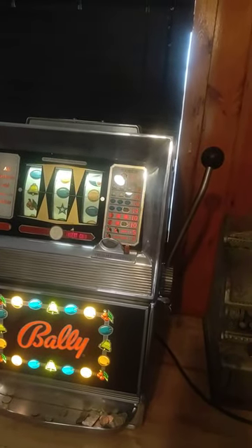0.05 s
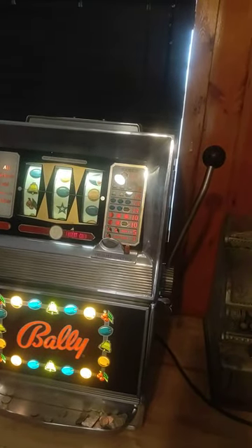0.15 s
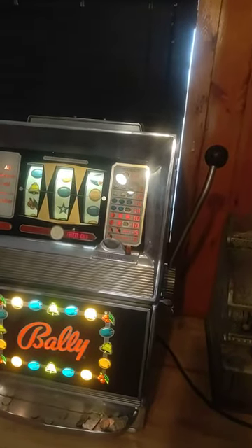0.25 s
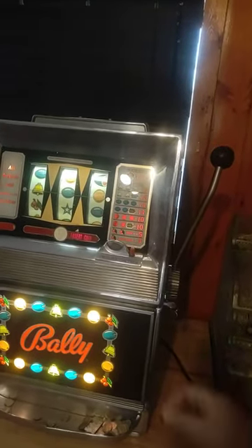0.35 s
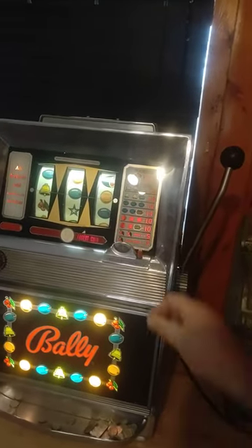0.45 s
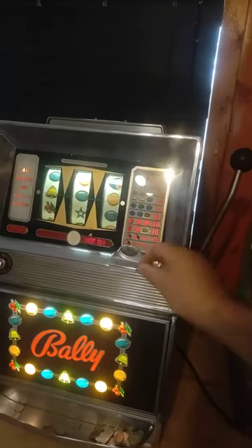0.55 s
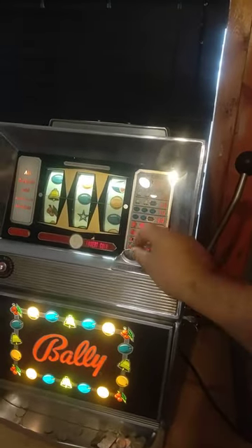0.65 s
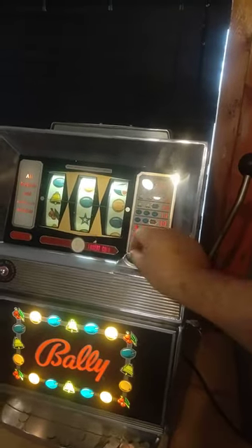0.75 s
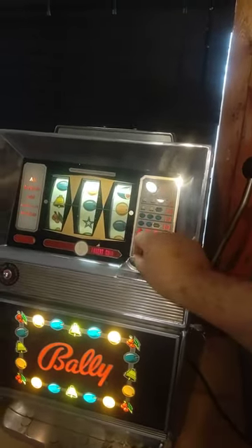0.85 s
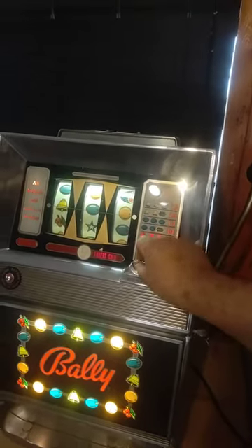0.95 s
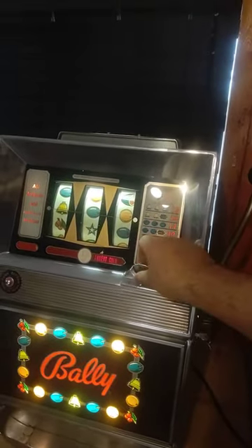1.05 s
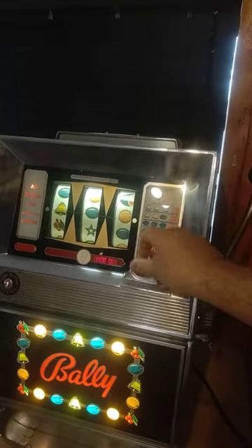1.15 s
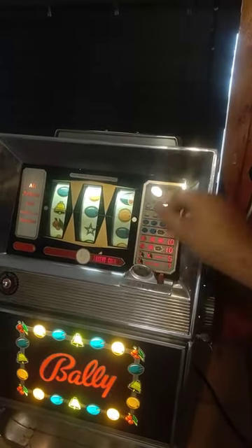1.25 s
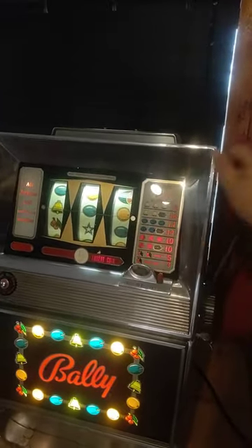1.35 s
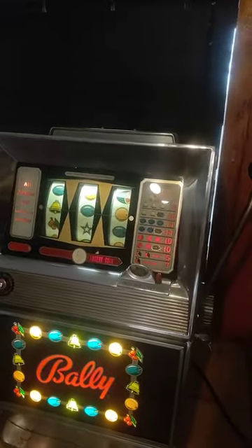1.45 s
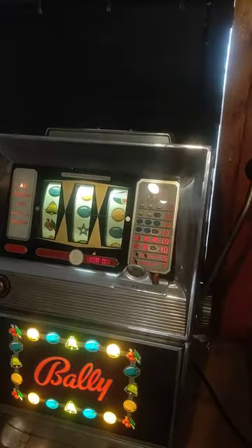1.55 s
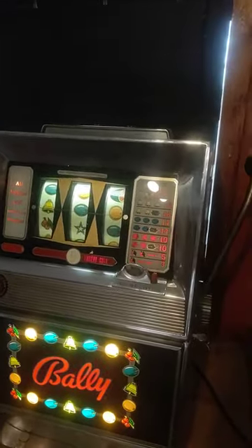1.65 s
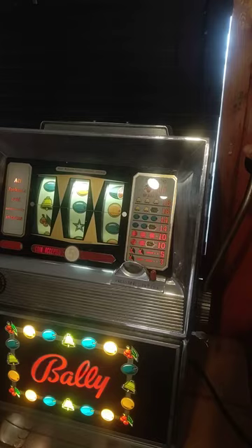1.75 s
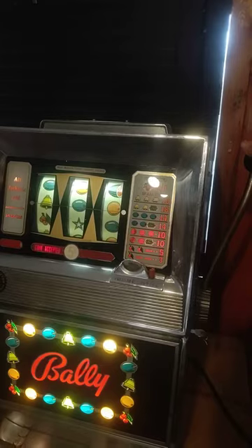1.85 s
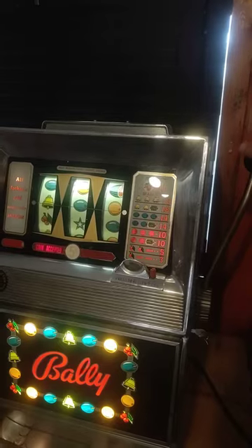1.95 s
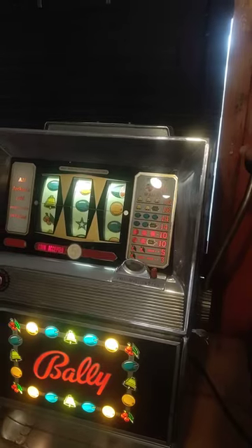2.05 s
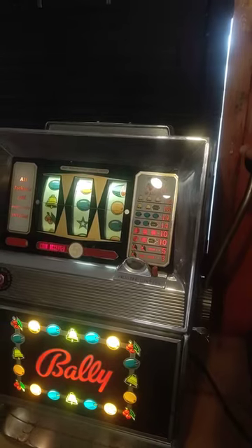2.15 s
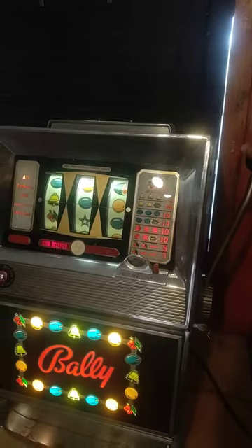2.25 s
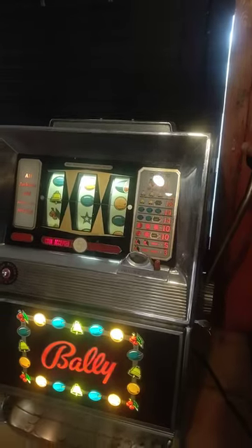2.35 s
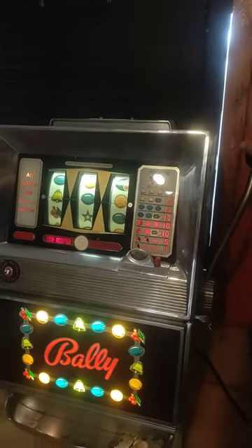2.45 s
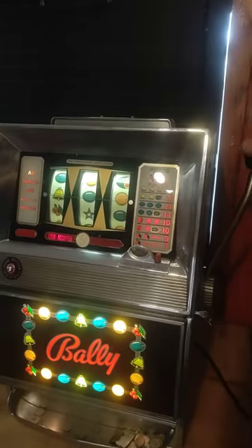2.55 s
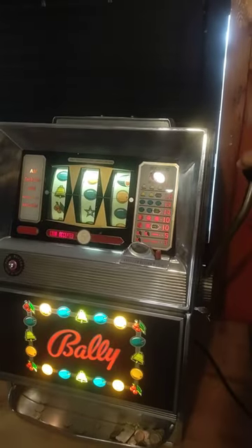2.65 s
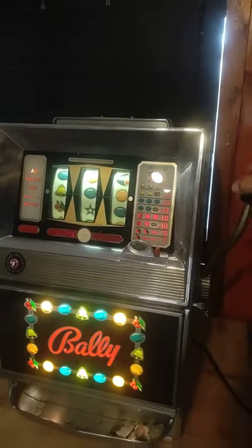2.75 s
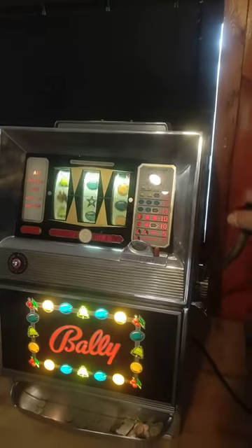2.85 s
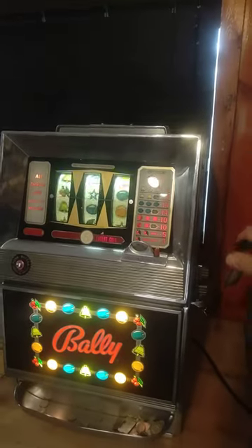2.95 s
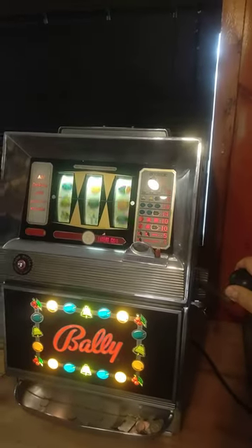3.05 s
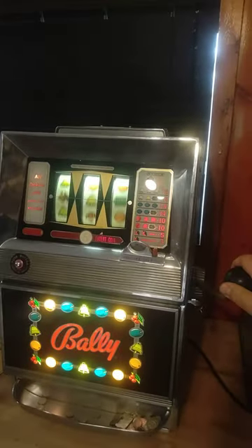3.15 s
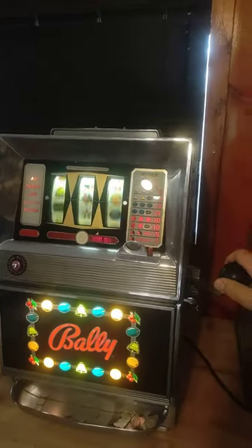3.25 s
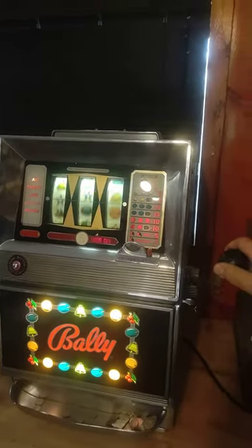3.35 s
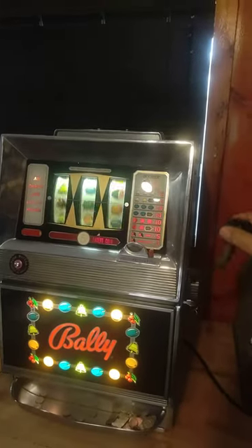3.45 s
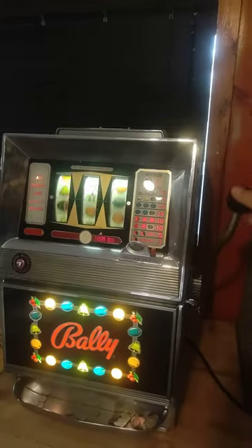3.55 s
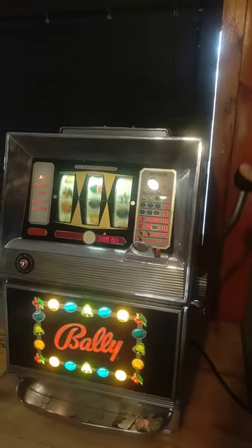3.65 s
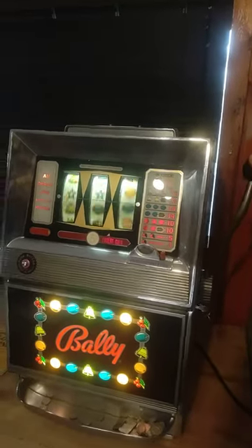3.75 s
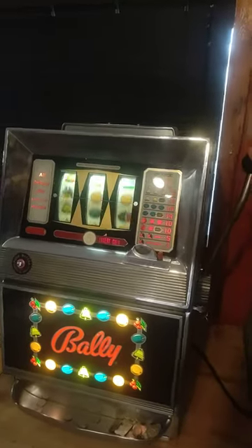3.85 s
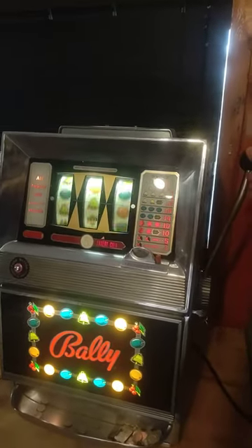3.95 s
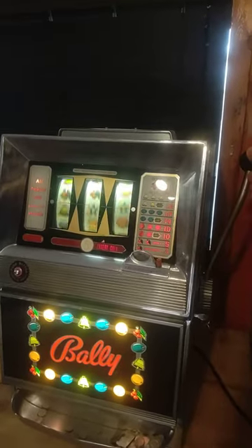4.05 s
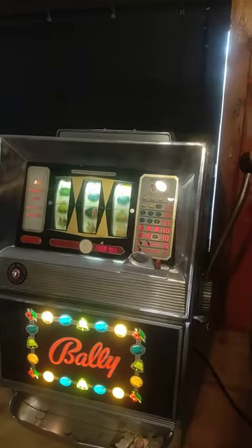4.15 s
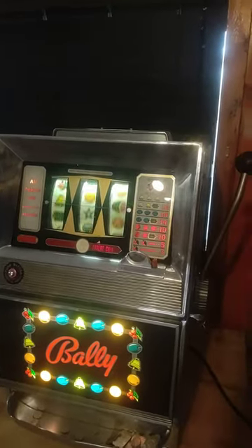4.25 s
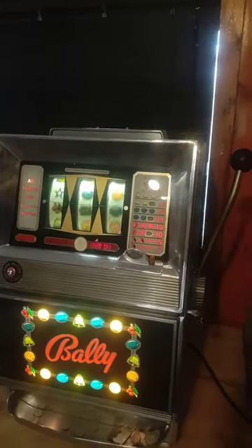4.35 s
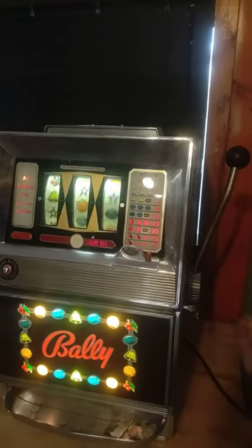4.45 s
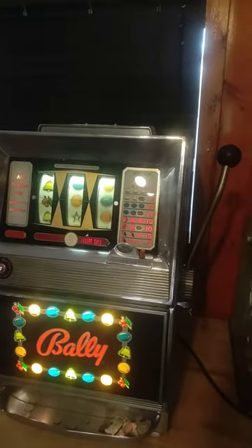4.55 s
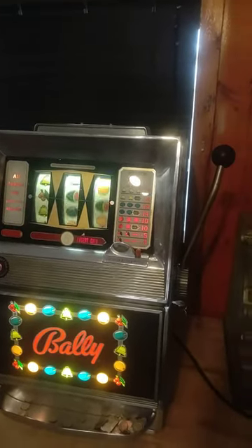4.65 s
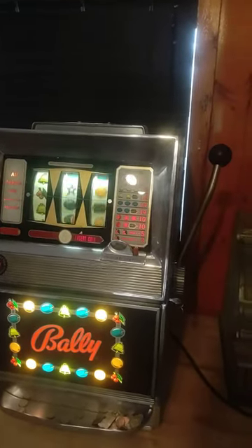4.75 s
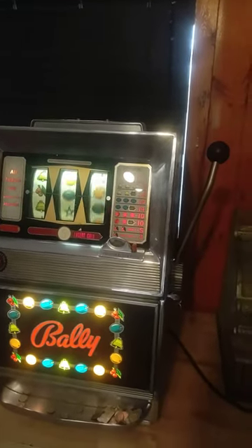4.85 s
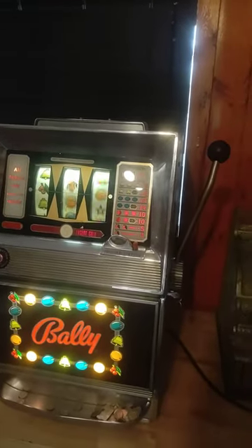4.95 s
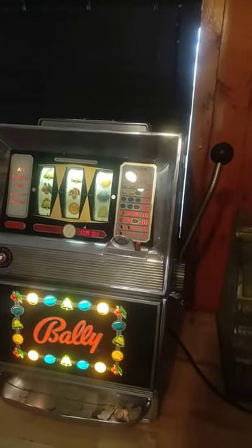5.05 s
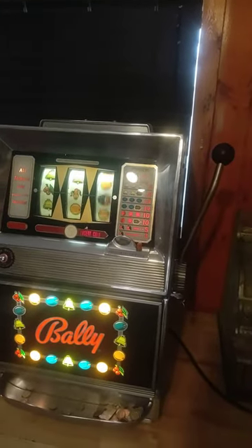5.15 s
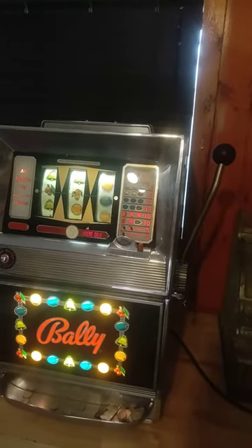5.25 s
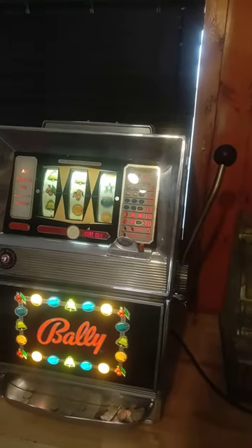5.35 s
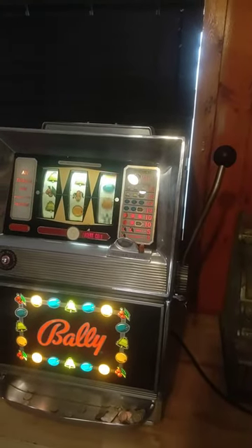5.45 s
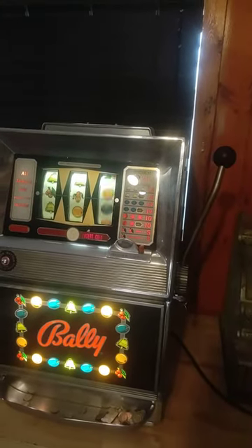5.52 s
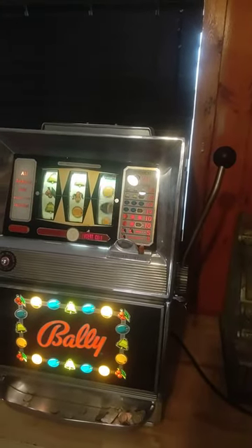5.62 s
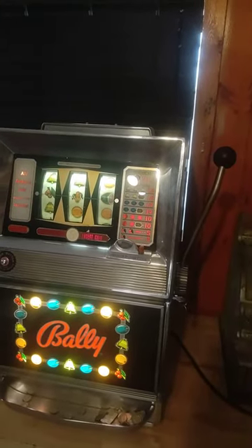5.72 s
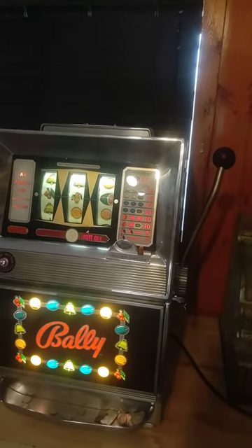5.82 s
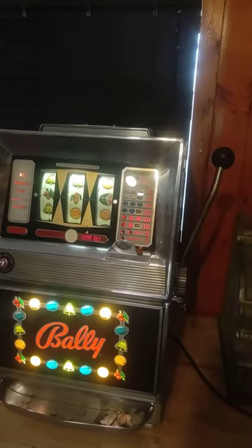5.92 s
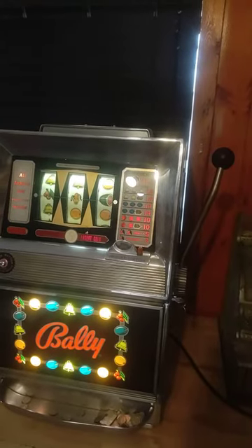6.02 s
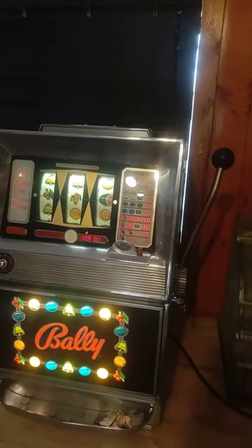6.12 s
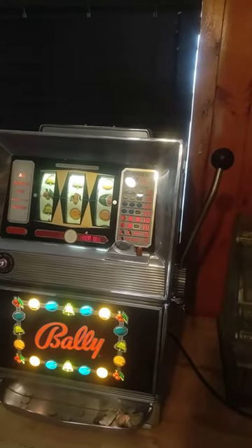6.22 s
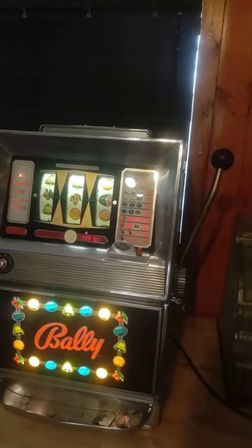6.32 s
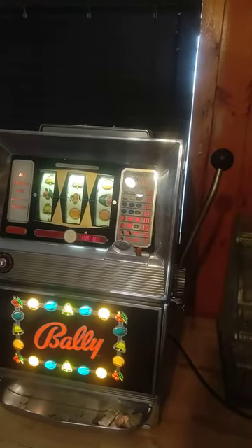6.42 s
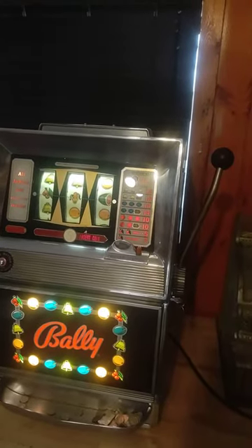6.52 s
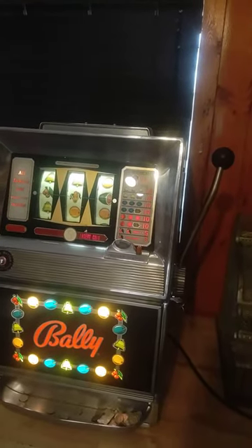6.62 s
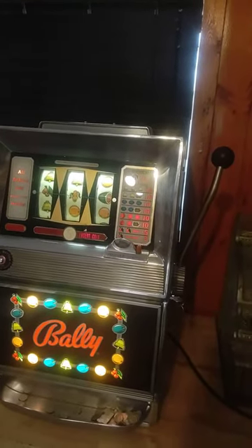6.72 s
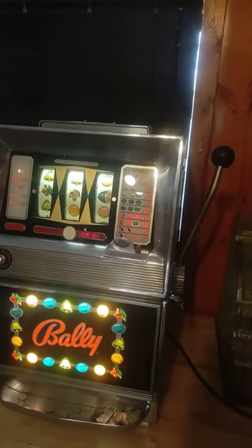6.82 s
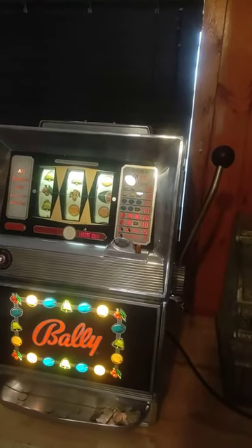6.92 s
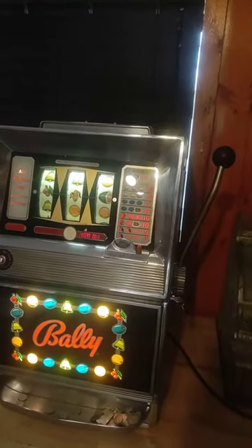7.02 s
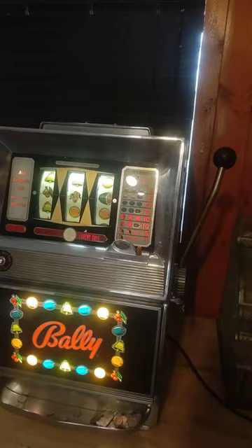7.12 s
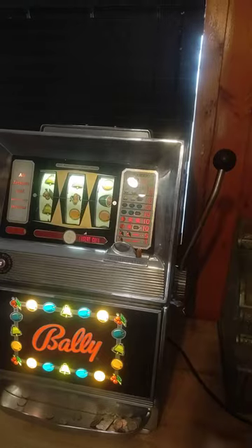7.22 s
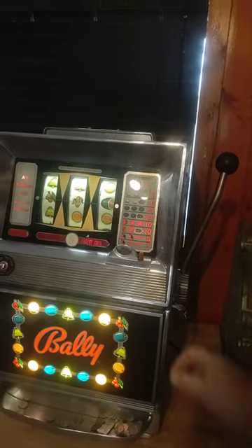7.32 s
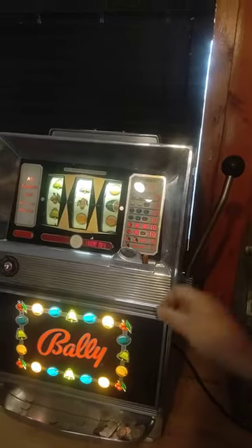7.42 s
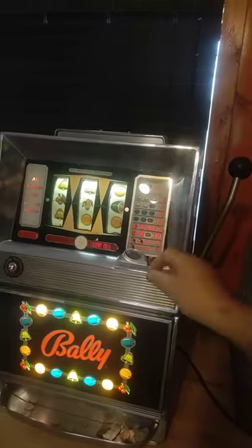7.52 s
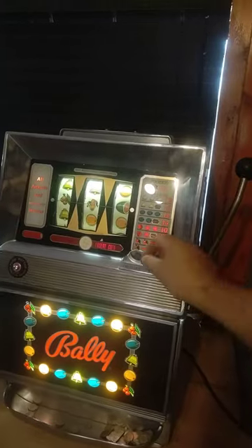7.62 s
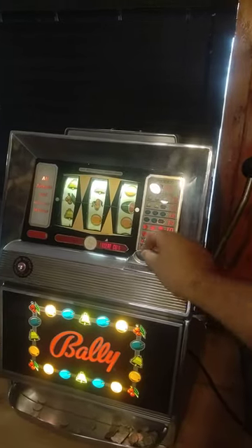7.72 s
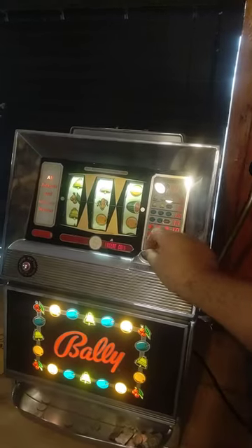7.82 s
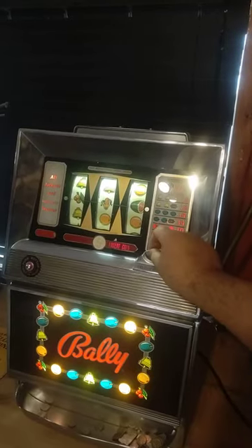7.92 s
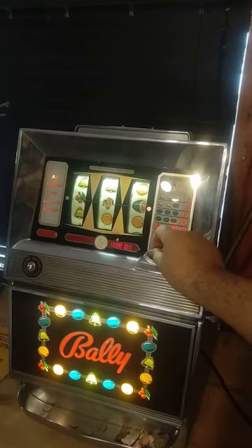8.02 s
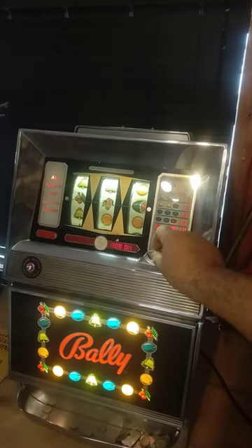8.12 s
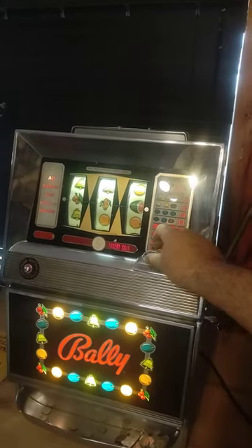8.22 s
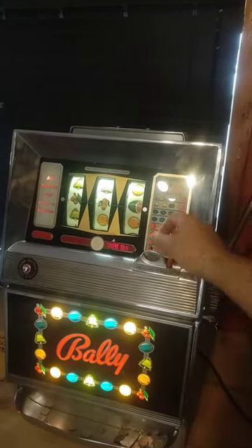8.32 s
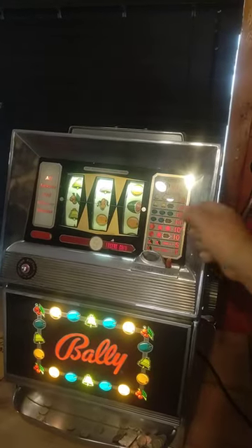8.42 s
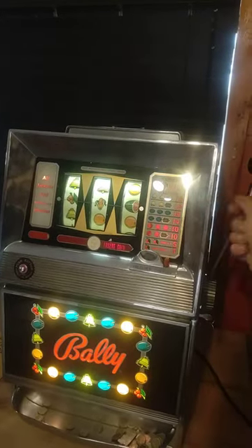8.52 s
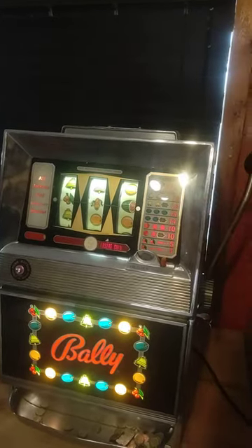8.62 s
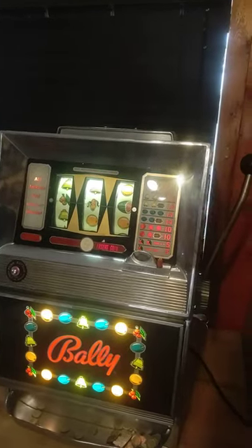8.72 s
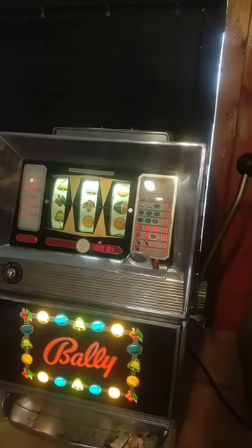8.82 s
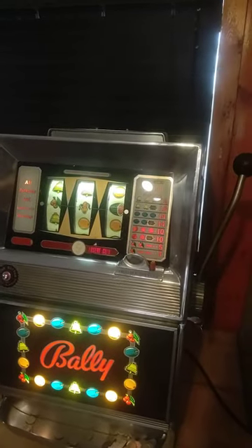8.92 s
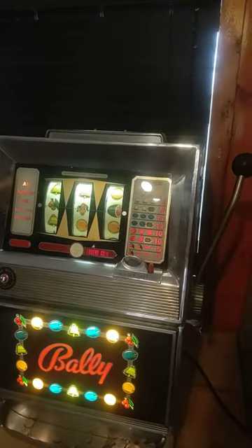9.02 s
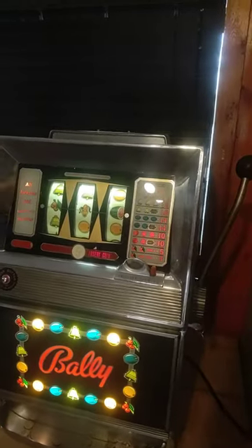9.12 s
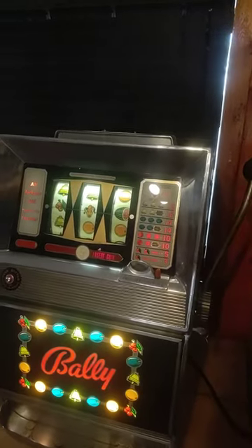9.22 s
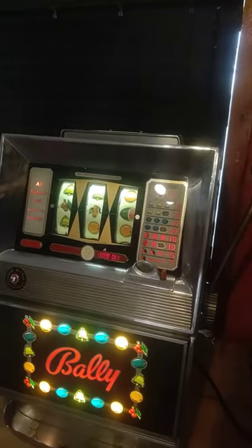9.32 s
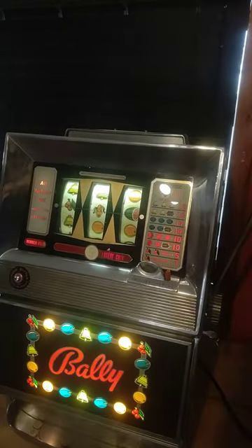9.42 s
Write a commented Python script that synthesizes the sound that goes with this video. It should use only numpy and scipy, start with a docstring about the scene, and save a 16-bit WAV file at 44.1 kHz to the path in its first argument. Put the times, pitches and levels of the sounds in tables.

```python
"""An old electromechanical slot machine in a small wooden room, heard by a phone a metre away.
A coin rattles down the chute, the lever ratchets down and back, and the reels spin and latch one by one,
leaving springs ringing. From 6 s a held coil hums under faint ticks. A second coin drops near 8 s, and
at 9 s the hopper starts to throw clinking coins. Every knock is a short rattle of loose steel parts
that drives the resonances of the chute, lever, reels or hopper."""
import sys
import numpy as np
from scipy import signal
from scipy.fft import rfft, irfft, next_fast_len
from scipy.io import wavfile

SR = 44100
rng = np.random.default_rng(int(sys.argv[2]) if len(sys.argv) > 2 else 0)


def wrap_up_sound(samples):
    """Save the sound to the file named by the first command line argument, as 16-bit audio."""
    columns = np.atleast_2d(samples).T
    # keep every value between -1 and 1, then stretch to whole-number steps
    tamed = np.clip(columns, -1, 1)
    steps = np.round(tamed * 32767).astype(np.int16)
    wavfile.write(sys.argv[1], SR, steps)


N = 417627

SIDE_SIGN = np.array([[1], [-1]])  # a side signal adds on the left and subtracts on the right


def undb(db):
    """Decibels to amplitude."""
    return 10 ** (np.asarray(db) / 20)


def unit(x):
    """Scale to an RMS of one."""
    return x / np.sqrt(np.mean(x ** 2))


def over_octaves(hz, table):
    """Read a curve along a logarithmic frequency axis."""
    points_hz, values = np.transpose(table)
    return np.interp(np.log(hz), np.log(points_hz), values)


def air():
    """Quiet room tone and microphone hiss; the bass is alike on both sides."""
    # noise colour: frequency_hz, relative_db
    spectrum = [(20, -27.5), (60, -4.5), (120, 0), (250, -1.5), (400, -10), (600, -10.5), (1000, -17),
                (2000, -14), (3500, -21), (6000, -25.5), (16000, -24.5)]
    level_db, left_right_db = -74, [[-1.8], [1.8]]
    hz = np.maximum(np.arange(N // 2 + 1) * SR / N, 1)
    mid, side = rfft(rng.standard_normal((2, N)))
    noise = mid + np.clip(hz / 1200, .15, 1) * side * SIDE_SIGN
    tone = irfft(undb(over_octaves(hz, spectrum)) * noise, N)
    return undb(level_db) * unit(tone) * undb(left_right_db)


def room(x):
    """The wooden room's diffuse tail, octave by octave; bass echoes reach both sides alike."""
    # reverb time: frequency_hz, t60_s
    decay = [(100, 0.99), (400, 0.43), (2000, 0.37), (6000, .35), (14000, 0.052)]
    wet_db, build_s = -6, .0066
    t, tail = np.arange(SR * 3 // 4) / SR, 0
    for hz in 62.5 * 2 ** np.arange(9):
        t60 = over_octaves(hz, decay)
        mid, side = rng.standard_normal((2, len(t)))
        edges_hz = [hz / np.sqrt(2), min(hz * np.sqrt(2), .45 * SR)]
        octave = signal.butter(2, edges_hz, "band", fs=SR, output="sos")
        echoes = mid + min(hz / 900, 1) * side * SIDE_SIGN
        tail = tail + signal.sosfilt(octave, echoes) * 1000 ** (-t / t60) / np.sqrt(t60 * SR / 7)
    tail = tail * (1 - np.exp(-t / build_s))
    return undb(wet_db) * signal.fftconvolve(x, tail, axes=1)[:, :N]


def hum():
    """A held coil buzzes at twice the mains frequency over the faint, steady hum of the lamps."""
    # coil envelope: time_s, level_db
    swell = [(5.99, -100), (6.03, -55), (6.4, -65), (7.2, -67), (8.2, -64.5), (9.47, -50)]
    # coil overtones: harmonic number -> relative_db
    overtones = {2: -15, 3: -20, 4: -28, 6: -27, 7: -18.5, 9: -29.5, 12: -31}
    # lamp hum: pitch_hz, level_db
    lamp_tones = [(360.3, -80.5)]
    coil_hz = 119.9
    t = np.arange(N) / SR
    phase = 2 * np.pi * coil_hz * t
    coil = np.sin(phase) + sum(undb(db) * np.sin(k * phase + k) for k, db in overtones.items())
    lamps = sum(undb(db) * np.sin(2 * np.pi * hz * t) for hz, db in lamp_tones)
    return np.sqrt(2) * (undb(np.interp(t, *np.transpose(swell))) * coil + lamps)


def add_partial(out, start_s, hz, db, t60, stop_s=np.inf):
    """Mix in one partial that swells quickly and dies away, or is choked at stop_s."""
    i = int(start_s * SR)
    t = np.arange(min(int(t60 * SR), N - i)) / SR
    envelope = (1 - np.exp(-t / .0018)) * 1000 ** (-t / t60)
    choke = np.exp(-np.maximum(t + start_s - stop_s, 0) / .003)
    tone = np.sin(2 * np.pi * (hz * t + rng.random((2, 1))))
    out[:, i:i + len(t)] += undb(db) * choke * envelope * tone


def ringing_steel():
    """Springs, rods and panels sing on after a blow; a coin let into the slot rings the chute's mouth."""
    # springs, rods and panels: start_s, pitch_hz, level_db, t60_s
    springs = [(4.556, 3560, -44.5, .35), (4.622, 258.2, -35, 0.16), (5.049, 3480, -36, 0.29),
               (5.05, 1800, -45.5, 0.5), (6.001, 1056, -41, 1.2), (6.002, 191.6, -34, .5),
               (6.003, 812, -46, 0.51), (6.003, 3080, -64, 1.1), (6.003, 4600, -32, 0.38),
               (8.823, 1950, -32, 0.19), (9.005, 1745, -24.5, 0.6), (9.171, 1400, -27, 0.2)]
    # coins entering the slot: start_s
    drops = [1.096, 8.245]
    # partials of the mouth: pitch_hz, level_db, t60_s
    mouth = [(1019, -39, 0.17), (2170, -44.5, 0.44), (3700, -37, .25)]
    out = np.zeros((2, N))
    for partial in springs + [(start_s, *mode) for start_s in drops for mode in mouth]:
        add_partial(out, *partial)
    return out


def coin_clinks():
    """Each coin rings at a close pair of partials until the next clink; no two are quite in tune."""
    # clinks: start_s, level_db
    clinks = [(0.0034, -58), (8.8214, -43), (9.0044, -26), (9.0822, -25), (9.0995, -20), (9.1651, -16),
              (9.1825, -17), (9.2453, -21), (9.2698, -14.5), (9.3294, -16), (9.369, -21), (9.4325, -23)]
    # a coin's partials: pitch_hz
    pair = [13716, 13838]
    out = np.zeros((2, N))
    tunings = 1 + .00055 * rng.standard_normal(len(clinks))
    stops_s = [start_s for start_s, _ in clinks[1:]] + [np.inf]
    for (start_s, db), stop_s, tuning in zip(clinks, stops_s, tunings):
        shared_db = db - 20 * np.log10(len(pair))
        for hz in pair:
            add_partial(out, start_s, hz * tuning, shared_db, t60=.28, stop_s=stop_s)
    return out


def ratchet(teeth, bright_db, first_hz, step_hz):
    """The knocks of one ratchet run, climbing in pitch from tooth to tooth."""
    thud_db, rattle_s = -25, .009
    return [(start_s, db, thud_db, bright_db, first_hz + k * step_hz, rattle_s)
            for k, (start_s, db) in enumerate(teeth)]


def knocks():
    """Cue lists of the blows in the chute, lever, reels and hopper, in that order."""
    # blows: start_s, level_db, thud_db, bright_db (both relative to level_db), pitch_hz, rattle_s
    chute = [(0.003, -55, -38, 6.5, 2600, .0033), (0.398, -51.5, -15, -17, 2100, 0.0058),
             (0.648, -50.5, -14.5, -19, 2050, 0.0078), (0.759, -35.5, -35, -8.5, 1680, 0.0092),
             (0.917, -53.5, -30, -17, 1940, .005), (0.993, -53, -25, -23, 1720, .0056),
             (1.095, -22.5, -27.5, -17.5, 2190, 0.0099), (1.108, -33, -23, -14, 2160, 0.037),
             (1.203, -32.5, -28, -19, 2130, .0068), (1.237, -35, -31, -16, 3940, .012),
             (1.259, -28.5, -29, -16, 2140, 0.0086), (1.278, -28, -17.5, -19, 997, 0.019),
             (1.353, -28, -15, -38, 3660, 0.0067), (1.398, -34.5, -10.5, -25, 1370, .012),
             (1.428, -32, -28, -26, 1670, 0.0084), (1.487, -35.5, -11, -23, 1420, .011),
             (1.537, -25.5, -14, -15, 1660, 0.0067), (1.62, -24, -23.5, -24, 1890, .028),
             (1.646, -16, -25.5, -21, 2150, .0039), (1.702, -20, -19.5, -22, 815, 0.011),
             (1.716, -9, -31.5, -23.5, 1880, 0.0099), (1.749, -18.5, -20.5, -18, 3520, 0.01),
             (1.764, -27, -18.5, -13, 2190, .017), (1.798, -29, -22, -10.5, 2300, .011),
             (1.892, -26, -15.5, -23, 2820, 0.0064), (1.953, -34.5, -18.5, -22.5, 2800, 0.0082),
             (2.079, -57.5, -10, -15, 990, .0093), (2.113, -48.5, -22, -31, 2800, 0.0082),
             (2.156, -51, -26, -28, 3080, .0083), (8.058, -47.5, -22.5, -22.5, 1720, 0.011),
             (8.172, -37, -32, -29.5, 3800, 0.014), (8.244, -21.5, -24.5, -15.5, 3780, 0.0068),
             (8.259, -26.5, -46, -19, 3800, 0.021), (8.392, -36.5, -18, -11, 3630, 0.0047),
             (8.425, -25, -20.5, -17, 3800, 0.011), (8.467, -27.5, -21, -24, 3600, 0.02),
             (8.518, -33.5, -17, -22, 970, 0.012), (8.581, -31.5, -15.5, -24, 1840, 0.01),
             (8.612, -27.5, -26, -30, 3770, .01), (8.711, -34, -11, -24, 1510, 0.012),
             (8.803, -26, -14, -15, 1700, 0.0067), (8.823, -19, -35, -16.5, 1930, 0.011),
             (8.921, -26.5, -11.5, -13.5, 1850, 0.015)]
    lever = [(2.454, -48.5, -17, -42.5, 837, 0.0064), (2.474, -50, -20, -18, 2780, .0056),
             (2.598, -46.5, -9, -21.5, 3640, 0.013), (2.76, -22, -24, -16.5, 3180, .0066),
             (2.97, -4, -25, -17, 2970, 0.0094), (3.003, -11, -17.5, -11.5, 3790, 0.015),
             (3.059, -3, -18, -15, 4130, 0.0089), (3.199, -34, -14, -39, 1280, .0051),
             (3.385, -33.5, -20, -21, 2220, .0073), (3.446, -47.5, -8.5, -32, 3700, .0062),
             (3.808, -10.5, -22, -11, 1635, 0.0093), (3.882, -20.5, -23.5, -7.5, 2900, 0.008),
             (3.974, -46.5, 9, -31, 993, 0.0056)]
    reels = [(4.127, -53, 2, -27, 834, 0.0068), (4.157, -54, 2, -29, 916, 0.0095),
             (4.268, -48, -8.5, -17, 1104, 0.0084), (4.512, -41.5, -2.5, -28, 877, 0.015),
             (4.531, -33.5, -24, -42, 910, 0.019), (4.555, -29.5, -15.5, -22, 3500, 0.01),
             (4.622, -32.5, -4.5, -38, 1417, 0.009), (4.936, -54, -4.5, -15, 805, 0.012),
             (4.99, -40.5, -4, -28, 1050, 0.019), (5.013, -35, -18, -12.5, 3450, 0.018),
             (5.048, -19.5, -17.5, -24.5, 1115, .01), (5.298, -52.5, -14, -12.5, 787, 0.01),
             (5.525, -51.5, -44, -41, 3650, 0.0064), (5.611, -44, 1.5, -20, 1144, 0.0097),
             (5.629, -33.5, -29, -20, 1120, 0.01), (5.718, -34, -7, -25, 926, 0.021),
             (5.742, -23.5, -21, -27, 1095, .011), (5.976, -23, -11, -22, 1920, 0.009),
             (6.001, -11, -18.5, -36, 4580, 0.015)]
    hopper = [(8.969, -6.5, -41, -21, 4210, .0049), (8.975, -12, -40, -26, 1900, 0.0047),
              (9.004, -8, -36, -14.5, 4050, 0.0071), (9.09, -20.5, -22, -8.5, 1830, 0.01),
              (9.107, -20.5, -21, -11.5, 1670, 0.012), (9.161, -24.5, -13.5, -2, 1040, 0.0034),
              (9.167, -14, -38, -6, 4470, .009), (9.187, -20, -23, -12, 2410, 0.0027),
              (9.2463, -17.5, -17.5, -2.5, 2900, 0.0056), (9.268, -19.5, -19, -0.5, 3580, 0.0041),
              (9.3279, -12.5, -21, -8, 4580, .0036), (9.3686, -3, -42, -4, 4180, 0.0014),
              (9.375, -7, -24.5, -13, 4200, 0.0058), (9.383, -8.5, -25.5, -12, 3320, 0.0092),
              (9.433, -17, -22.5, -2, 4770, 0.0031), (9.4645, -19.5, -19, 0.5, 3900, 0.0023)]
    # ratchet teeth going down and back, and ticks of the resting machine: start_s, level_db
    teeth_down = [(2.642, -23.5), (2.691, -21), (2.731, -17.5), (2.777, -16.5), (2.824, -16.5),
                  (2.869, -13.5), (2.913, -12), (2.956, -13)]
    teeth_back = [(3.512, -22), (3.554, -18.5), (3.597, -18.5), (3.642, -16), (3.696, -16.5),
                  (3.754, -17.5)]
    idle_ticks = [(6.617, -50.5), (6.809, -63), (7.055, -52), (7.299, -57), (7.595, -57), (7.813, -52),
                  (7.946, -58)]
    pull = ratchet(teeth_down, bright_db=-14, first_hz=2745, step_hz=129.9)
    release = ratchet(teeth_back, bright_db=-11, first_hz=2396, step_hz=70.3)
    thud_db, bright_db, pitch_hz, rattle_s = -13.5, -17.5, 1904, .0086
    ticks = [(start_s, db, thud_db, bright_db, pitch_hz, rattle_s) for start_s, db in idle_ticks]
    return [chute, lever + pull + release, reels + ticks, hopper]


def struck_parts():
    """Each knock lands on its own part, whose one resonance the rattle drives."""
    ring_db, ring_q = -6.5, 18
    out, t = np.zeros((2, N)), np.arange(SR // 10) / SR
    for start_s, db, *_, hz, rattle_s in sum(knocks(), []):
        i = int(start_s * SR)
        impacts = rng.standard_normal(len(t)) * np.exp(-t / (1.1 * rattle_s))
        ring = signal.lfilter(*signal.iirpeak(hz, ring_q, SR), impacts)
        out[:, i:i + len(t)] += undb(db + ring_db) * ring[:N - i] / np.abs(ring).max()
    return out


def grit(likeness, spread_db):
    """Dense tiny impacts of uneven size; likeness (0-1) is how much left and right share."""
    size = np.repeat(undb(spread_db * rng.standard_normal(N // 32 + 1)), 32)[:N]
    mid, side = rng.standard_normal((2, N))
    return unit(size * (np.sqrt(1 + likeness) * mid + np.sqrt(1 - likeness) * side * SIDE_SIGN))


def resonate(x, modes):
    """A bank of resonances, neighbours in opposite phase; white noise keeps about its level."""
    out, power = 0, 0
    for k, (hz, width_hz, db) in enumerate(modes):
        gain = (-1) ** k * undb(db)
        out = out + gain * signal.lfilter(*signal.iirpeak(hz, hz / width_hz, SR), x)
        power += gain ** 2 * np.pi * width_hz / SR
    return out / np.sqrt(power)


def motion(moves, band):
    """Power of parts rolling, sliding and turning: rumble in the low band, chatter in the others."""
    rise_s, fall_s = .03, .044
    trim_db = [-2.5, -5, -1, -13][band]
    t, power = np.arange(N) / SR, 0
    for start_s, end_s, rumble_db, chatter_db in moves:
        db = (rumble_db if band == 0 else chatter_db) + trim_db
        rise = np.clip((t - start_s) / rise_s, 0, 1) ** 2
        fall = np.exp(-np.maximum(t - end_s, 0) / fall_s)
        power = power + undb(2 * db) * rise * fall
    return power


def rattles(blows, voicing, band):
    """Power of the knocks in one band: loose parts chatter briefly and the cabinet shudders on."""
    drive_db = [4.6, 4.82, 4.87, 8.12][band]
    stretch = [1.63, 1.26, .8, .54][band]  # heavier parts are shaken for longer
    shudder_db, shudder_s = [-14.5, -19.5, -19.5, -28][band], [.04, .03, .03, .022][band]
    upper_db, middle_offset_db = voicing
    t, power = np.arange(SR // 2) / SR, np.zeros(N)
    shudder = undb(2 * shudder_db) * np.exp(-t / shudder_s)
    for start_s, db, thud_db, bright_db, _, rattle_s in blows:
        i, fall_s = int(start_s * SR), rattle_s * stretch
        attack = 1 - np.exp(-t / (.75 * fall_s))
        burst = attack * (np.exp(-(t / fall_s) ** 1.24) + shudder)
        middle_db = (thud_db + upper_db) / 2 + middle_offset_db
        band_db = [thud_db, middle_db, upper_db, bright_db][band]
        power[i:i + len(t)] += undb(2 * (db + band_db + drive_db)) * burst[:N - i]
    return power


def mechanism():
    """Knocks and motion shake chute, lever, reels and hopper, each ringing with its own modes."""
    # low, middle and upper resonances of each part: pitch_hz, width_hz, gain_db
    chute = ([(182, 50, -8), (317.7, 33, -1), (356, 26, -0.5), (408, 40.7, 2)], [(564, 49, -1.5),
             (800, 150, -3), (1017, 234, -1.5), (1574, 170, -3)], [(1900, 240, 0), (2145, 133, 3),
             (2796, 480, -1), (3397, 130, 5.5), (3760, 250, 4), (4400, 140, 0), (4690, 207, -1.5)])
    lever = ([(63, 27, -15.5), (115.9, 30, -7.5), (206, 84, -4), (261, 39, 1.5), (296, 15, 5.5),
             (370, 120, -7.5)], [(556, 170, -1.4), (850, 230, -0.88), (1094, 190, 0.92), (1330, 100, -0.72),
             (1612, 190, -0.13)], [(2008, 730, -3), (2880, 78, 2.5), (3087, 78, 1), (3670, 280, 0),
             (4208, 120, 0.5), (4163, 200, 0.5), (5003, 400, -11)])
    reels = ([(66, 11, -5.5), (116, 16, 0.5), (142, 24, -2.5), (190.3, 16, 3), (261, 41, 0.5),
             (299.3, 20, 2), (402, 82, -6.5)], [(509, 37, 0.9), (857, 130, 0.1), (1114, 73, 0.9),
             (1430, 250, -2)], [(1930, 500, -2.5), (2810, 650, 0.5), (3580, 384, 4), (4500, 510, -2),
             (5240, 890, -8)])
    hopper = ([(115, 43, -4.5), (204, 37, -2), (287, 25, -1.5), (401, 36, 0)], [(519, 14, 10.5),
              (783, 150, 1), (1120, 490, 0), (1360, 280, 2)], [(1830, 440, -2.5), (2490, 520, -1),
              (3460, 1370, -1), (4340, 310, 1.5), (4660, 210, 0)])
    # small bright plates, alike in every part: pitch_hz, width_hz, gain_db
    plates = [(6040, 1200, -3), (7320, 800, -0.5), (8220, 950, 1.5), (9880, 1800, -2), (11500, 1300, -4.5),
              (15300, 2500, -16)]
    # stretches of steady movement: start_s, end_s, rumble_db, chatter_db
    coin_rolls = [(0.778, 0.925, -91, -69.5), (1.2, 1.8, -54.5, -58.5), (1.9, 2.395, -73.5, -77),
                  (8.283, 8.42, -60, -48), (8.42, 8.696, -61, -59.5), (8.803, 8.963, -43.5, -45.5)]
    lever_travel = [(2.4, 2.652, -69.5, -76), (2.65, 2.902, -45.5, -58), (2.88, 3.05, -29, -40.5),
                    (3.25, 3.55, -58, -63), (3.549, 3.85, -45.5, -53.5), (3.9, 4.047, -56, -74)]
    reel_spin = [(4.025, 5.9, -71, -75), (6.1, 6.884, -69, -76)]
    payout = [(9, 9.6, -39.5, -32.5)]
    # knock tone, one row a part: upper_db (relative to the knock), middle_offset_db
    voicings = [(-10, -2.5), (-9.5, -3.5), (-8.5, -3.5), (-9.5, -2.5)]
    movements = [coin_rolls, lever_travel, reel_spin, payout]
    parts = list(zip(knocks(), voicings, movements, [chute, lever, reels, hopper]))
    out = 0
    for band, likeness in enumerate([1, .77, .24, .084]):  # low, middle, upper, bright: ever wider
        impacts = grit(likeness, spread_db=3.5)
        for blows, voicing, moves, modes in parts:
            power = motion(moves, band) + rattles(blows, voicing, band)
            out = out + resonate(np.sqrt(power) * impacts, (*modes, plates)[band])
    return out


def microphone_ports(x):
    """The phone's body shades its two ports unevenly; the left is further away and hears late."""
    # stereo tilt: frequency_hz, left_minus_right_db
    balance = [(60, -1.5), (110, -4.5), (200, -1.5), (380, -2.5), (700, -2), (1290, -3), (2380, -9.5),
               (4400, 4), (8120, -5.5), (15000, -4.5)]
    lag_s = .0002
    size = next_fast_len(N + 512)
    hz = np.arange(size // 2 + 1) * SR / size
    shade_db = np.interp(hz, *np.transpose(balance)) / 2
    left = undb(shade_db) * np.exp(-2j * np.pi * hz * lag_s)
    right = undb(-shade_db)
    return irfft(np.array([left, right]) * rfft(x, size), size)[:, :N]


def scene():
    """The machine, its echo and its hum reach the phone over a bed of room tone."""
    machine = mechanism() + struck_parts() + ringing_steel() + coin_clinks()
    return microphone_ports(machine + room(machine) + hum()) + air()


def record(dry):
    """The phone rounds the loudest peaks and cuts the top."""
    ceiling, top_hz = .9, 16400
    rounded = dry / (1 + np.abs(dry / ceiling) ** 10) ** .1
    return signal.sosfilt(signal.ellip(10, .2, 70, top_hz, fs=SR, output="sos"), rounded)


dry = scene()
out = record(dry)
wrap_up_sound(out)
```